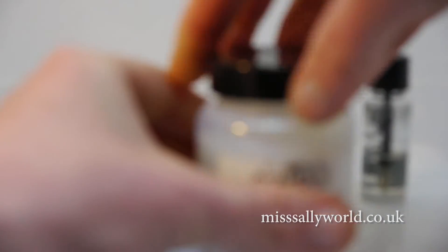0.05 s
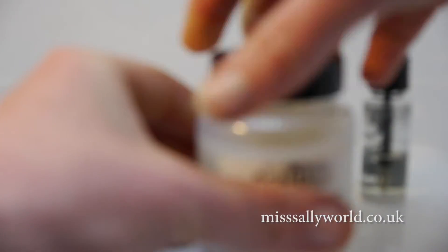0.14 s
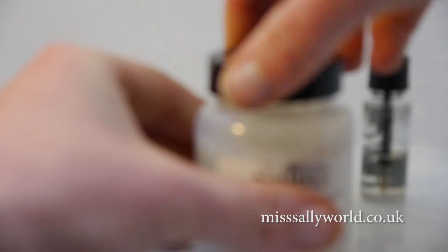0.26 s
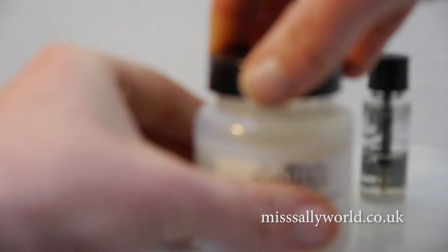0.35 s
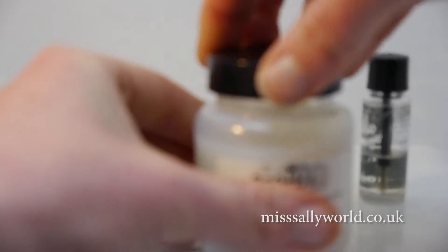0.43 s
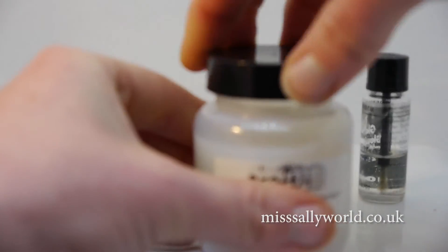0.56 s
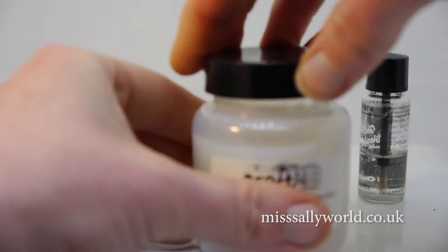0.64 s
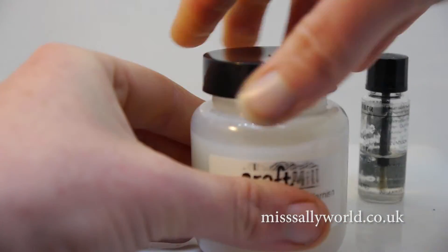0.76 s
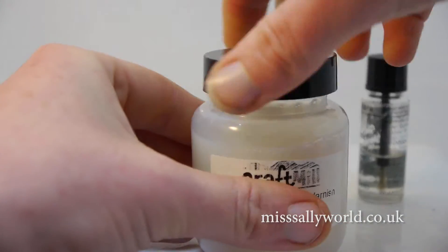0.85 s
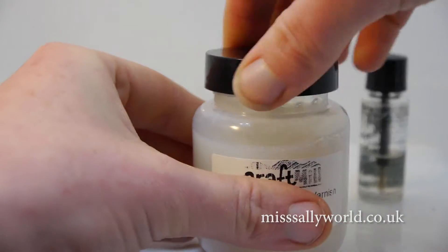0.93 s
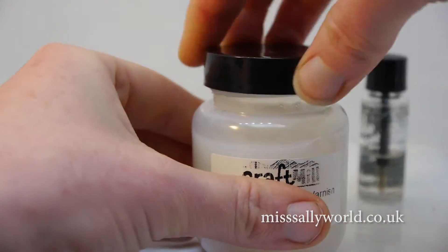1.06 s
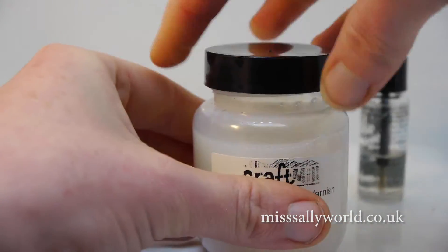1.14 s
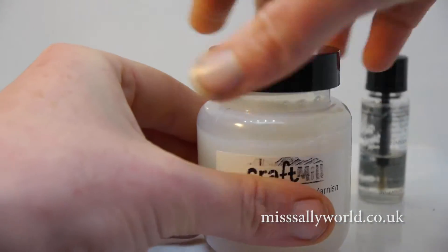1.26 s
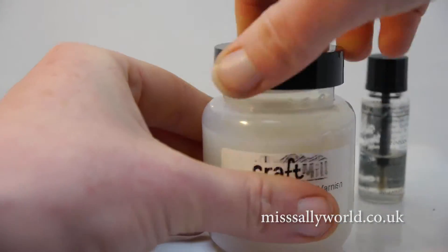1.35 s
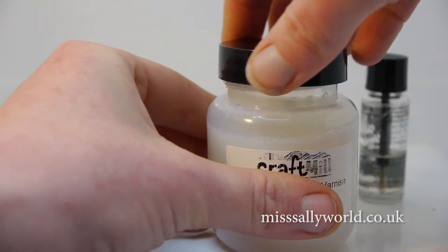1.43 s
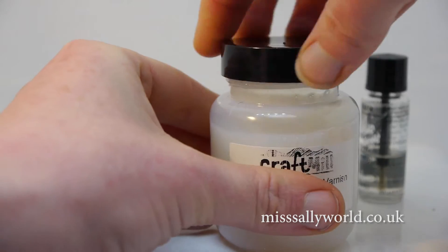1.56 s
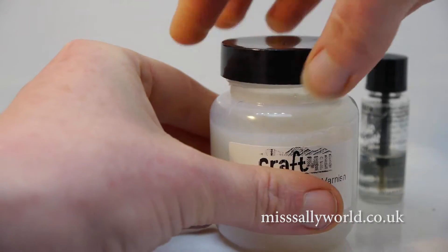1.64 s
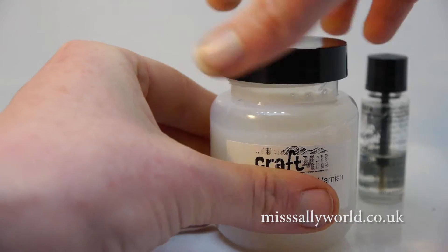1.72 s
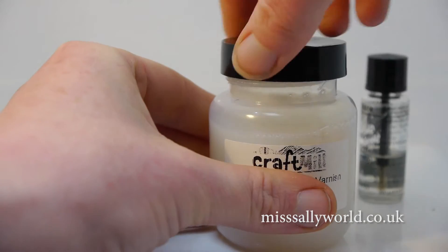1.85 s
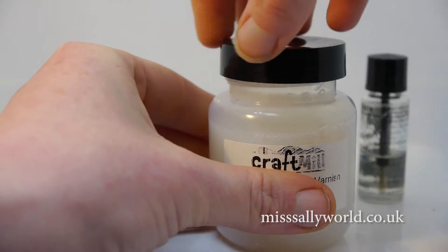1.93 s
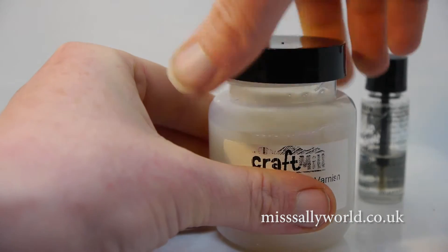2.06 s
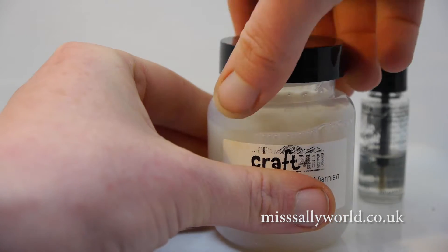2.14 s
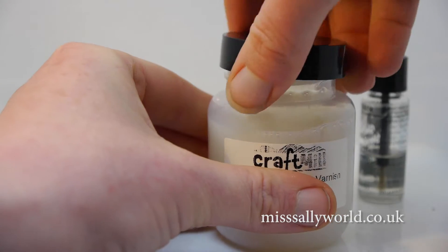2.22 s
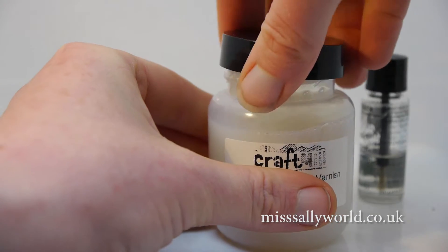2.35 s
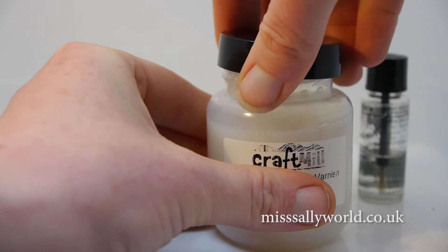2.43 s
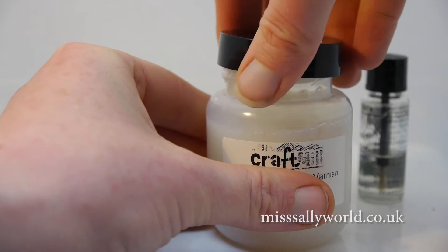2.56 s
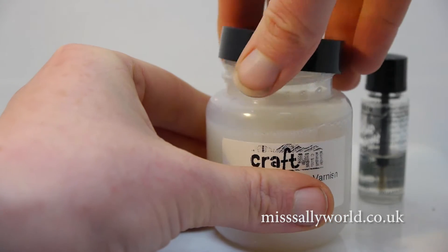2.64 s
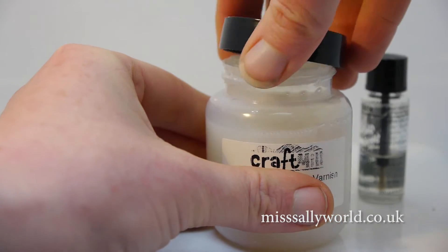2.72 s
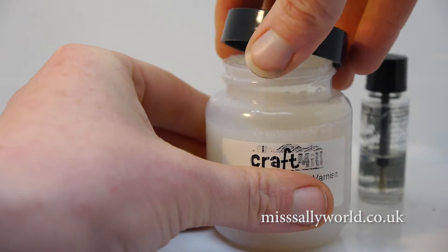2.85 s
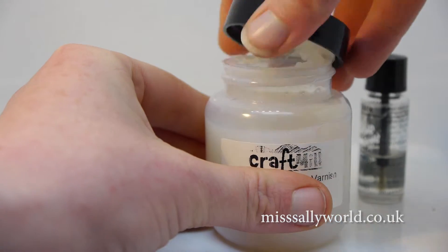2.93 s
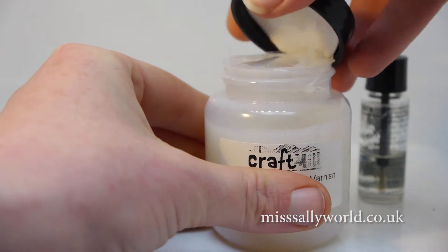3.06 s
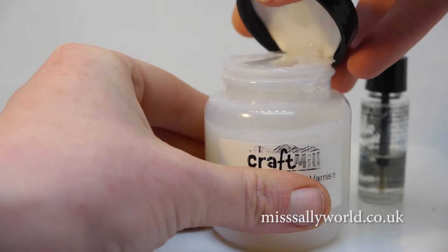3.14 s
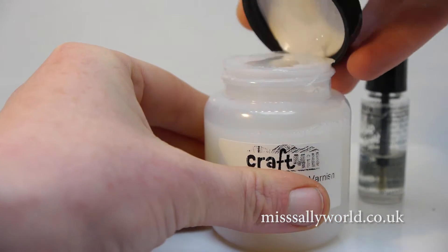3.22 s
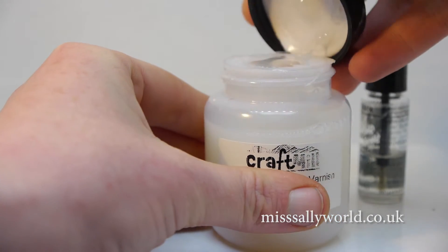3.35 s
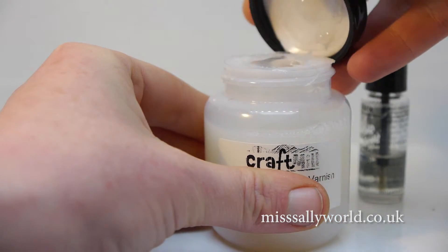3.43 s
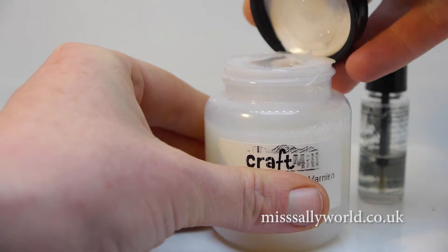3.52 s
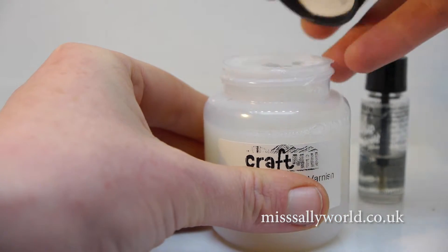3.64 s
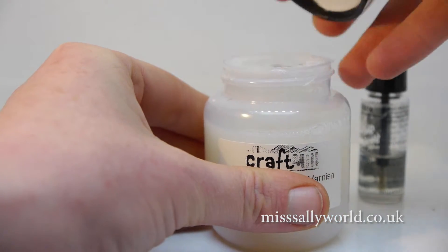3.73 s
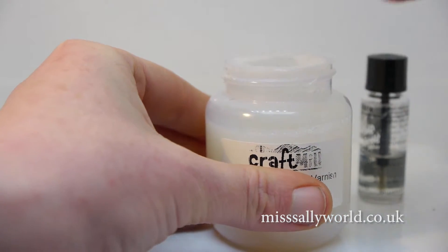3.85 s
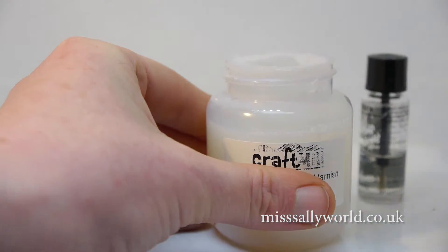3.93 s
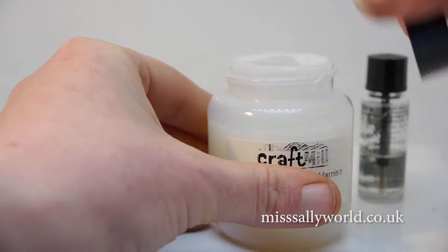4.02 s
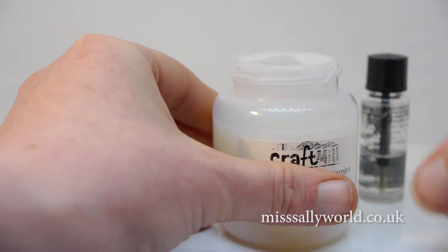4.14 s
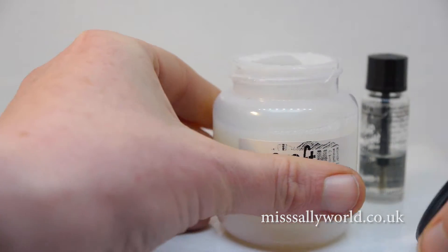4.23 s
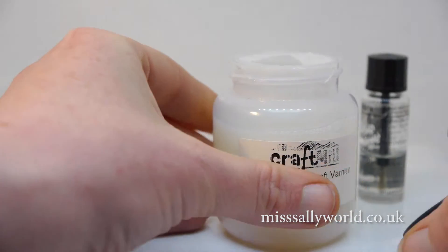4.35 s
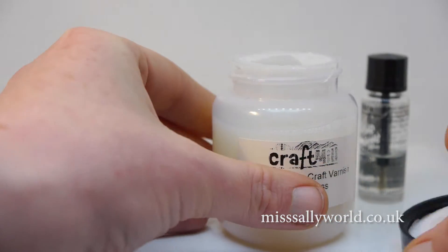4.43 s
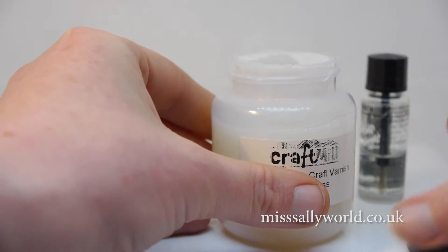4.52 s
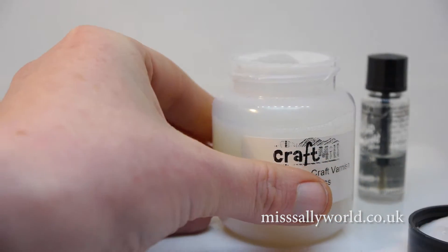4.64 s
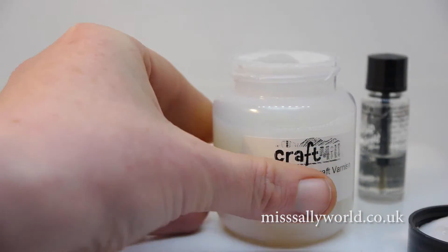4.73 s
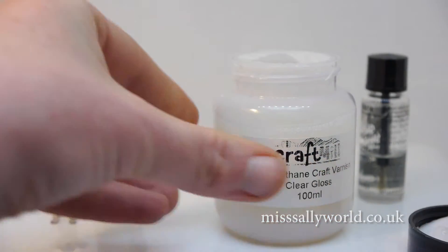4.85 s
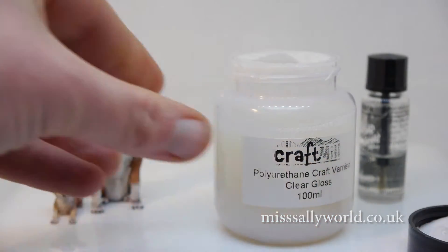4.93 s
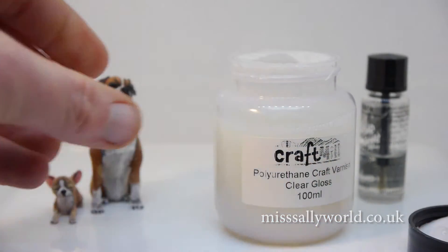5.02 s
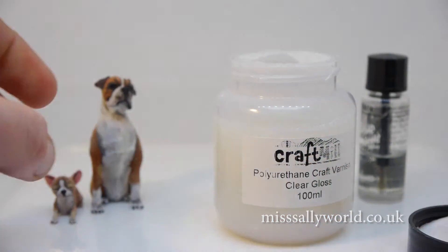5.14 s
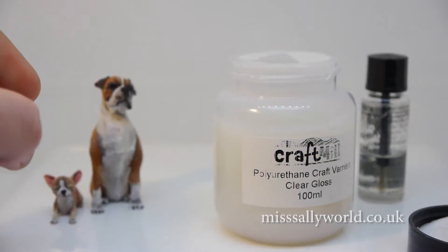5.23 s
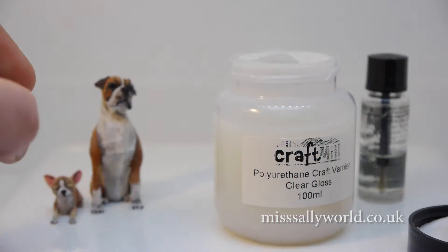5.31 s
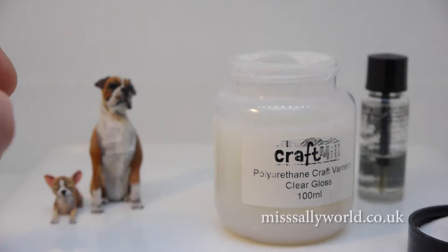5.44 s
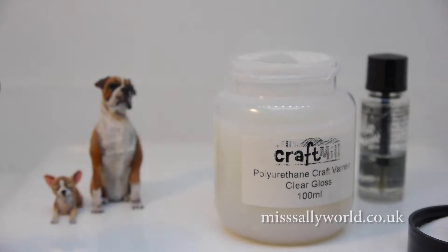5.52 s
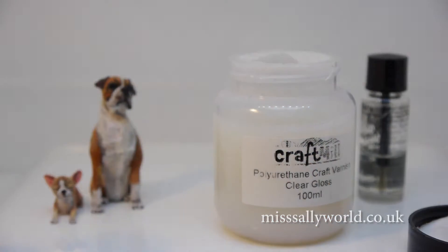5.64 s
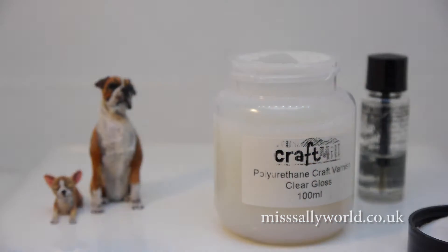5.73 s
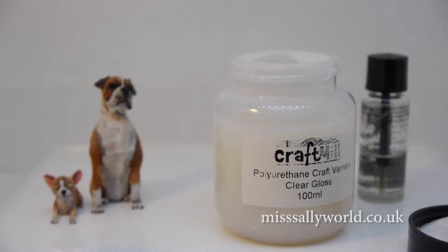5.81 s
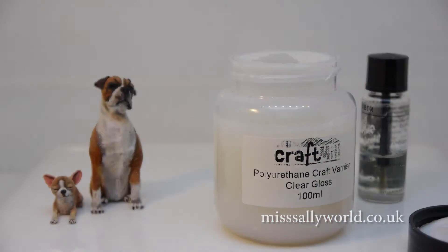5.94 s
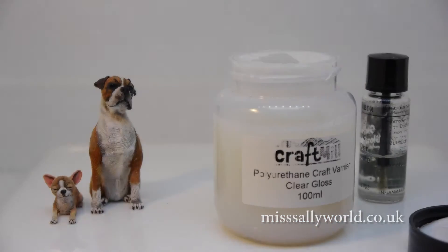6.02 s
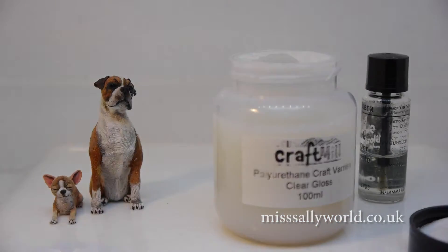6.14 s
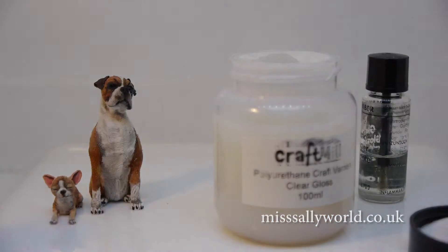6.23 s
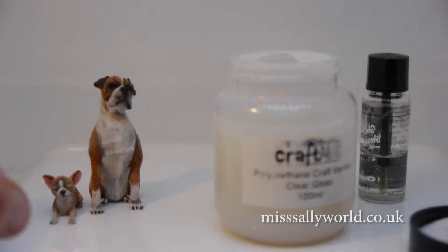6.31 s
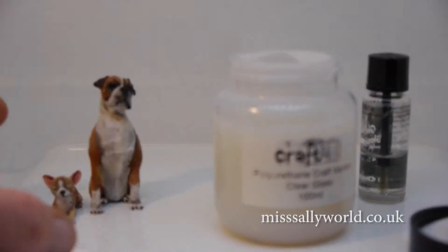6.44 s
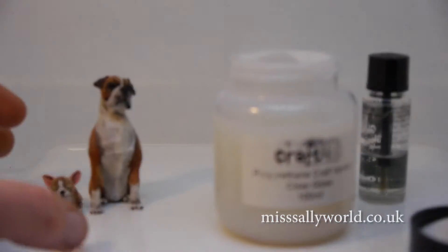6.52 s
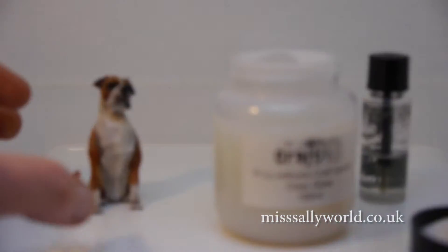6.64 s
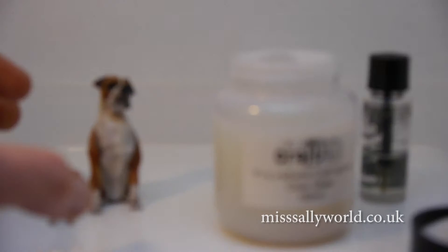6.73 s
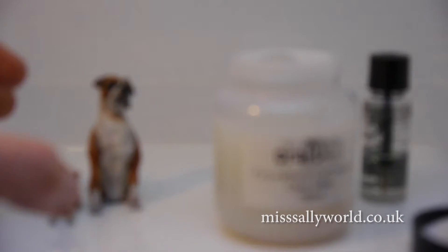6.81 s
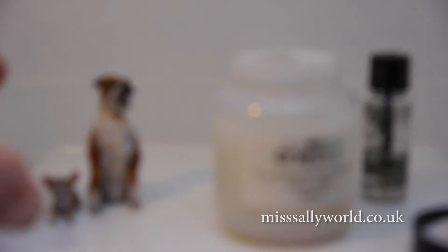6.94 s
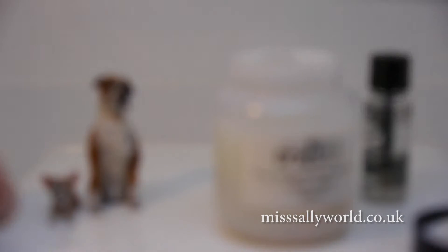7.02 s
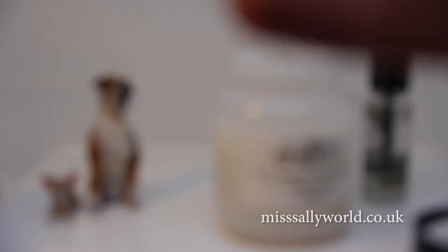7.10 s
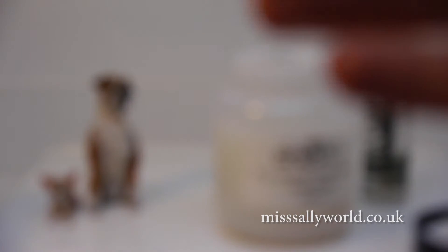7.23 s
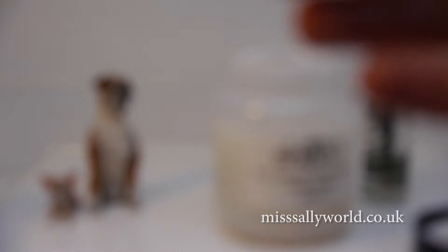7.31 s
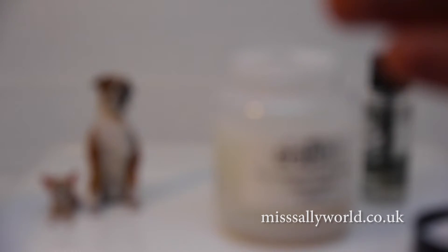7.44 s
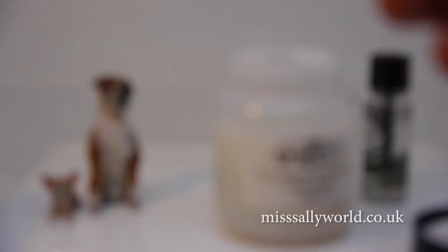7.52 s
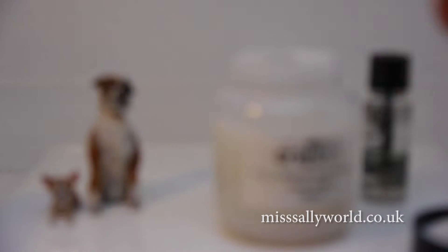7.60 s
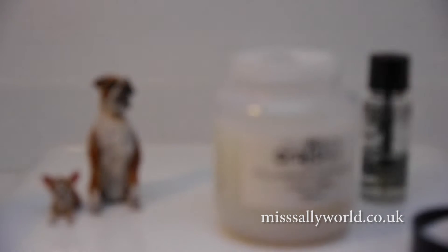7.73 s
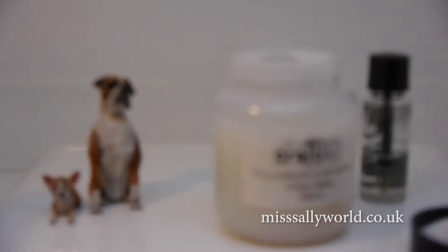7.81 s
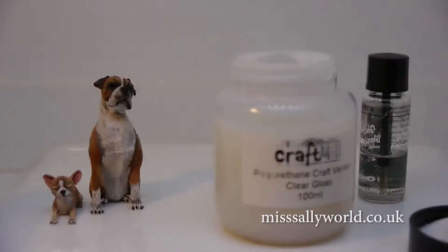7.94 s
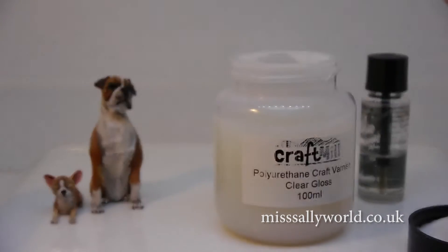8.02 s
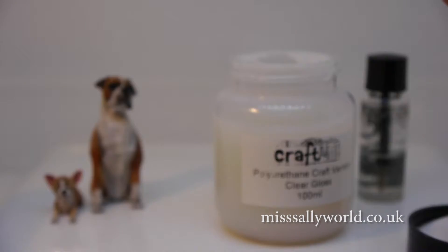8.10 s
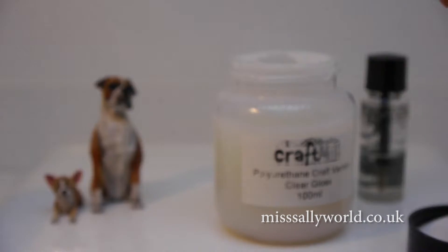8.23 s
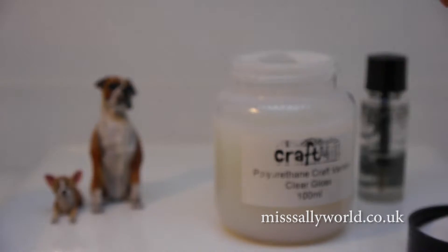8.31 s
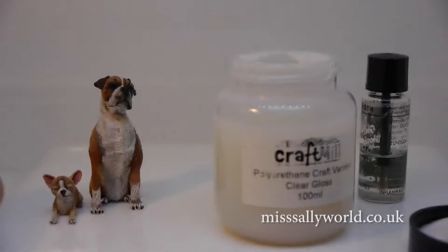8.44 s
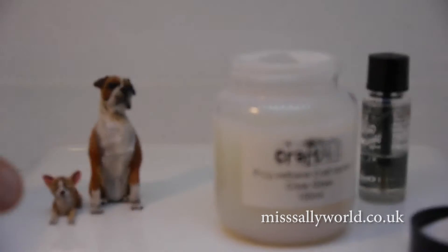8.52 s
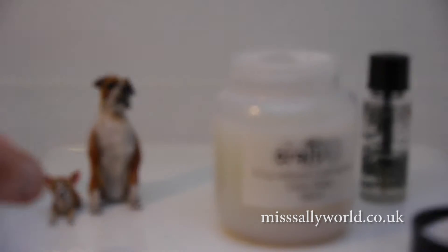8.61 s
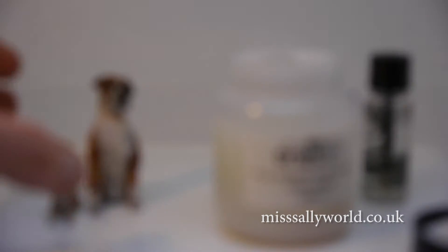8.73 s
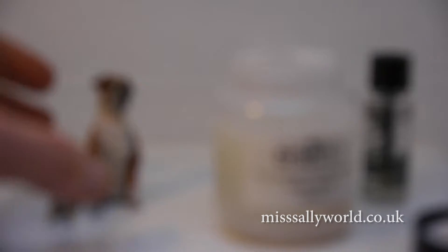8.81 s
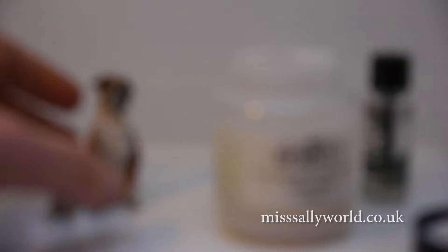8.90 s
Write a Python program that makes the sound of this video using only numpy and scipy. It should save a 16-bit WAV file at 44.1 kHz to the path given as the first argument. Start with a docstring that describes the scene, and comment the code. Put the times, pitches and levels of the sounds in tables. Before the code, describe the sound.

From the start, a plastic lid is twisted off a small jar, close up in a quiet room. The thread sticks and slips in short, thin rasps, crackles and ticks, while the jar rocks on the table with dull, hollow bumps, strongest near 1.7 and 2.7 seconds. A sharp tick comes at 3 seconds, then the lid scrapes round the rim and clicks free at about 3.6. At 4.3 seconds it knocks onto the table and settles with a quick chatter around 4.5, the loudest moment. Between 5.1 and 5.5 seconds a small figurine is set down with several light clacks. A hand slides softly over the tabletop, with a small tap at 6.2, a couple of ticks and two faint sleeve swishes before 7 seconds. After that only a few tiny ticks and a very faint whirr remain over low room hum, until about 9 seconds.

```python
"""A plastic lid is unscrewed from a small jar on a table, close up in a quiet room.
The thread sticks and slips, rasping and crackling, while the jar bumps the tabletop and makes it boom.
The lid wipes round the rim, clicks free and lands with a chatter; then a small figurine clacks down.
A hand hisses over the table and nudges it, a sleeve swishes, and a faint whirr rises over the room tone."""
import sys
import numpy as np
from scipy import signal
from scipy.fft import rfft, irfft, next_fast_len
from scipy.io import wavfile

SR = 44100
rng = np.random.default_rng(int(sys.argv[2]) if len(sys.argv) > 2 else 0)


def wrap_up_sound(samples):
    """Save the sound to the file named by the first command line argument, as 16-bit audio."""
    columns = np.atleast_2d(samples).T
    # keep every value between -1 and 1, then stretch to whole-number steps
    tamed = np.clip(columns, -1, 1)
    steps = np.round(tamed * 32767).astype(np.int16)
    wavfile.write(sys.argv[1], SR, steps)


N = 395430
TIME = np.arange(N) / SR
BLOW_TIME = np.arange(SR // 4) / SR   # seconds within one blow

# pushes of the lid along the thread, round the rim and off it: start_s, length_s, level_db
LID_TURNS = [(0, 0.11, -50), (.31, 0.67, -55), (.83, 1.0, -45), (.98, 0.24, -50.5), (1.28, 0.18, -44),
             (1.365, 0.082, -40.5), (1.47, 0.18, -42.5), (1.7, 0.95, -50.5), (2.107, 0.086, -40.5),
             (2.28, 0.13, -39.5), (2.755, 0.12, -40.5), (2.73, 0.81, -45), (2.985, 0.25, -41.5),
             (3.3, 0.12, -38), (3.36, 0.23, -42), (3.5, 0.6, -55)]
# skids and ticks of plastic and fingertips: start_s, level_db, t60_s, brightness_hz
SKIDS = [(0.345, -40.5, 0.17, 15600), (0.452, -44, 0.042, 14000), (1.093, -45, 0.017, 16000),
         (1.31, -42, 0.029, 16000), (1.415, -36, 0.051, 7240), (1.724, -41.5, 0.018, 12000),
         (1.894, -42.5, 0.024, 8750), (2.131, -47, .04, 12000), (2.17, -54, 0.024, 10000),
         (2.464, -44.5, .043, 7100), (2.645, -48, 0.078, 5630), (2.961, -31.5, 0.04, 12000),
         (3.249, -40, 0.055, 5500), (3.505, -35, 0.037, 11000), (3.942, -39, 0.031, 12000),
         (4.057, -40, 0.061, 12100), (4.205, -45, 0.029, 4000), (4.791, -46, 0.031, 10700),
         (5.374, -42, 0.095, 16300), (5.495, -44.5, 0.051, 14000), (6.496, -42, 0.026, 12000),
         (6.643, -35.5, 0.047, 10500), (7.551, -54.5, 0.074, 13000), (7.902, -51, .06, 13200),
         (8.17, -60.5, .06, 8000)]
# knocks: start_s, level_db, hardness (0 padded push, 1 bare edge)
JAR_BUMPS = [(0.066, -25, 0), (0.088, -25, 0.27), (0.212, -36.5, 0.26), (0.291, -29, 0.28),
             (0.546, -36.5, 0.78), (0.736, -36.5, 0.61), (0.898, -25, 0.43), (1.143, -25, 0.46),
             (1.391, -28, 0.38), (1.649, -29.5, 0), (1.6935, -23, 0.54), (1.819, -31, 0.43),
             (1.861, -32.5, 0.39), (2.143, -26.5, 0.18), (2.284, -40, 0.82), (2.367, -29.5, 0.22),
             (2.684, -22.5, 0.56), (2.997, -32.5, 0.4), (3.612, -33, 0.57), (3.964, -34, 0.4)]   # jar rocking on the table
LID_HITS = [(3.0335, -39.5, 0.8), (3.5722, -34.5, 0.9), (3.5925, -29, 0.97), (4.3113, -13.5, 0.62),
            (4.3162, -20, 0.6), (4.5037, -14, 0.83), (4.519, -19.5, 0.56), (4.5584, -19, 0.84),
            (4.574, -19.5, 0.51), (4.5895, -24, 0.67)]   # lid striking the rim, then the table
FIGURINE_HITS = [(5.107, -22, 0.21), (5.2079, -19, 0.78), (5.2425, -19.5, 0.7), (5.3335, -22.5, 0.47),
                 (5.337, -15.5, 0.29), (5.4205, -23, 0.46), (6.2, -36, 0.73)]   # figurine set down and nudged
# table swaying after the heaviest pushes: start_s, level_db
TABLE_THUDS = [(0.074, -30.5), (0.912, -33), (1.691, -26), (1.849, -31), (2.688, -33), (3.588, -30.5)]
# hand sweeping over the table: middle_s, length_s, level_db
HAND_STROKES = [(4.06, 0.7, -55.5), (4.298, 0.12, -51), (4.79, 1.12, -55.5), (5.9, 4.3, -62),
                (6.199, 0.12, -46), (6.547, 0.4, -52.5), (6.887, 0.37, -63)]
# dull fingertip rubs: start_s, length_s, level_db, pitch_hz
FINGER_RUBS = [(6.285, 0.092, -54.5, 1480), (7.71, 0.12, -55, 840)]
# swells: start_s, length_s, level_db
LID_CHATTER = [(4.488, 0.028, -28.5), (4.505, 0.092, -40.5), (4.556, 0.075, -41.5)]   # rim settling on the table
SLEEVE_SWISHES = [(6.38, 0.16, -50.5), (6.75, 0.19, -50.5)]   # arm moving
WHIRRS = [(7.15, 0.68, -64), (7.8, 1.2, -73.5)]   # faint, narrow whirr
# resonances that give each source its tone: pitch_hz, width_hz, gain_db
THREAD_MODES = [(1200, 1330, -7), (2024, 205, 1.5), (2540, 1340, -8), (4200, 800, -0.5), (5090, 1190, -1),
                (6580, 2100, -0.5), (8330, 3100, -2), (11000, 1760, -2), (13720, 2200, -7.5)]
LID_MODES = [(2150, 370, -2), (2420, 150, 2.5), (2650, 100, 5.5), (3030, 190, 0.5), (3800, 620, -5.5),
             (4450, 130, 1.5), (4780, 610, -4.5), (7760, 590, -9), (9000, 870, -8.5), (11200, 2000, -11.5),
             (14200, 1800, -15.5)]
TABLE_MODES = [(169.2, 57, -2), (282.7, 20, 11), (352.4, 22, 8), (520.3, 40.6, 8.5), (691, 100, -0.5),
               (929, 150, 0), (1220, 79, -0.5), (1402, 190, -2), (1780, 130, -5.5)]
FIGURINE_MODES = [(1106, 45, 3), (1276, 54, 3.5), (1454, 94, 2), (2030, 230, -5.5), (3120, 460, -2),
                  (3970, 690, -2.5), (5130, 280, -1), (5750, 440, -5), (8360, 730, -8), (11000, 660, -7.5),
                  (13700, 2500, -13.5)]
SLEEVE_MODES = [(1830, 360, 2), (2340, 360, 4), (3040, 1700, -2)]
WHIRR_MODES = [(1940, 73, 0), (2700, 77, -6), (3430, 57, -7), (4600, 140, -8)]
# noise colours of sliding skin and room air: frequency_hz, density_db
SKIN_SPECTRUM = [(700, 2.5), (1100, -2), (2500, -3.5), (5000, -6), (7000, -9), (11000, -11), (16000, -19.5)]
AIR_SPECTRUM = [(20, -40.5), (45, -5.5), (68, -23.5), (95, 1.5), (120, -7.5), (145, -7.5), (270, -6),
                (390, -17.5), (540, -15.5), (1100, -22), (1450, -22.5), (2100, -29), (4700, -30.5),
                (7000, -35.5), (11000, -38.5), (16000, -41.5)]
# electrical hum and whine: pitch_hz, level_db
HUM_TONES = [(116, -56.5), (7574, -80)]
# how alike left and right are: frequency_hz, correlation (0-1)
STEREO_LIKENESS = [(30, 1), (400, 0.99), (2500, 0.71), (4000, 0.38), (8000, 0.22), (16000, 0.14)]

RING_GLIDE_S, RING_GLIDE_HZ, RING_WIDTH_HZ = (0.5, 0.85), (4605, 5133), 200   # rises as the lid loosens
HELD_UNTIL_S, LET_GO_S, RESTING_DB = 4.6, 0.24, -53   # the hands rub faintly until they let go
RUMBLE_DB, RUMBLE_AT_RASP_DB, RUMBLE_FOLLOWS = -41.5, -36.5, 0.72   # rumble takes part of the rasp's swing
DULL_HZ, BRIGHT_AT_DB, BRIGHT_FOLLOWS = 5500, -42.5, 0.24   # a rasp below BRIGHT_AT_DB loses treble
SOFT_HZ, HARD_HZ = 153, 6100   # contact cut-off at hardness 0 and 1
WALL_ECHO_S, WALL_ECHO_DB = 0.0051, -12   # wall just behind the jar
NEARBY_T60_S, NEARBY_DB = .045, -11
ROOM_T60_S, ROOM_DB, ROOM_CUT_HZ = .42, -24, 1500


def unscrewing(rasp_db, ring_db, crackle_db, touch_db):
    """The thread sticks and slips in thin, ringing plastic; a harder turn is louder and brighter."""
    rasp = np.hypot(swells(LID_TURNS), from_db(touch_db))
    slips = friction(per_s=12000, size_db=2.4) * from_db(1.7 * drift(per_s=110))
    slips = rms_one(slips + from_db(crackle_db) * crackles(per_s=150, size_db=4, pitches=12))
    ring_hz = np.interp(TIME, RING_GLIDE_S, RING_GLIDE_HZ)
    ring = low_pass(slips, RING_WIDTH_HZ / 2, order=1) * np.cos(2 * np.pi * np.cumsum(ring_hz) / SR)
    shell = rms_one(rms_one(resonate(slips, THREAD_MODES)) + from_db(ring_db) * rms_one(ring))
    dull = low_pass(shell, DULL_HZ, order=1)
    treble = np.minimum(rasp / from_db(BRIGHT_AT_DB), 1) ** BRIGHT_FOLLOWS
    plastic = from_db(rasp_db) * rasp * (dull + treble * (shell - dull))
    held = np.clip(1 - (TIME - HELD_UNTIL_S) / LET_GO_S, 0, 1)
    return held * (plastic + grip_rumble(rasp, grip_db=2.0, jar_cut_hz=950))


def crackles(per_s, size_db, pitches, width_hz=350):
    """Sticky patches snap one by one, each a sharp tick with a brief, high ring."""
    ticks = from_db(size_db * np.minimum(rng.exponential(1, N), 3)) * (rng.random(N) < per_s / SR)
    pitch_index = rng.integers(0, pitches, N)
    rings = sum(resonate(ticks * (pitch_index == k), [(hz, width_hz, 0)])
                for k, hz in enumerate(np.geomspace(3000, 14000, pitches)))
    return rms_one(rms_one(rings) / 2 + rms_one(ticks))


def grip_rumble(rasp, grip_db, jar_cut_hz):
    """The jar and the gripping hand carry the thread's friction down into the table."""
    effort = np.hypot(rasp, from_db(RESTING_DB)) / from_db(RUMBLE_AT_RASP_DB)
    drag = friction(per_s=1500, size_db=2.5) * from_db(2 * drift(per_s=40))
    table = rms_one(low_pass(resonate(low_cut(drag, 385), TABLE_MODES), jar_cut_hz, order=1))
    grip = rms_one(low_pass(resonate(drag, [(114, 26, -1.1), (393, 47, -1.2)]), 528))
    return from_db(RUMBLE_DB) * effort ** RUMBLE_FOLLOWS * (table + from_db(grip_db) * grip)


def skids(gain_db, rise_share):
    """A caught edge lets go in a short burst; the shortest are sharp ticks."""
    out = np.zeros((2, N))
    for start_s, db, t60_s, bright_hz in SKIDS:
        burst = resonate(scatter(t60_s, rise_share * t60_s), THREAD_MODES)
        burst = low_pass(low_cut(burst, bright_hz / 3), bright_hz)
        add(out, start_s, from_db(db + gain_db) * unit_blow(burst))
    return out


def knocks(hits, modes, rise_at_1khz_s, crack_t60_s, tail_t60_s, low_cut_hz,
           main_mode_db, rough_db, snap_db, soft_clack_db, hard_clack_db):
    """Each blow booms in the tabletop and clacks in the object; a soft one is duller and slower."""
    out = np.zeros((2, N))
    click = unit_blow(1. * (BLOW_TIME == 0))
    # the table's main mode is strongest for a blow near its middle
    table = [(hz, width, db + main_mode_db * (k == 1)) for k, (hz, width, db) in enumerate(TABLE_MODES)]
    for start_s, db, hardness in hits:
        contact_hz = SOFT_HZ * (HARD_HZ / SOFT_HZ) ** hardness
        clack_db = soft_clack_db + (hard_clack_db - soft_clack_db) * hardness
        rise_s = rise_at_1khz_s * 1000 / contact_hz
        push = low_pass(click + from_db(rough_db) * scatter(.045, rise_s), contact_hz)
        push = high_pass(push, low_cut_hz)   # a light object cannot drive the lowest modes
        boom = unit_blow(resonate(push, table))
        rattle = from_db(snap_db) * click + scatter(crack_t60_s, rise_s) + scatter(tail_t60_s, rise_s) / 2
        rattle = low_pass(low_pass(rattle, 5 * contact_hz, order=1), 20 * contact_hz)
        clack = pan(unit_blow(resonate(rattle, modes)), right_db=0.95)
        add(out, start_s, from_db(db) * (boom + from_db(clack_db) * clack))
    return out


def table_thuds(pitch_hz, width_hz, t60_s):
    """A heavy push makes the whole table sway: a slow, deep thud."""
    out, sway = np.zeros((2, N)), [(pitch_hz, width_hz, 0)]
    for start_s, db in TABLE_THUDS:
        push = scatter(t60_s, rise_s=t60_s / 10)
        add(out, start_s, from_db(db) * unit_blow(resonate(resonate(push, sway), sway)))
    return out


def lid_chatter(plastic_db, table_db):
    """Quick, tiny touches of the rim keep the lid and the tabletop ringing between the blows."""
    touches = friction(per_s=1500, size_db=2.5)
    plastic = from_db(plastic_db) * rms_one(resonate(low_pass(touches, 8400, order=1), LID_MODES))
    table = from_db(table_db) * rms_one(resonate(low_cut(touches, 664), TABLE_MODES))
    return swells(LID_CHATTER, shape=0.6) * (plastic + table)


def hand_slides(gain_db):
    """Skin on the tabletop gives a soft, grainy hiss that swells and fades with each sweep."""
    speed = sum(from_db(db) * np.cos(np.pi * np.clip((TIME - middle_s) / length_s, -.5, .5)) ** 2
                for middle_s, length_s, db in HAND_STROKES)
    hiss = rms_one(stereo_noise(N, SKIN_SPECTRUM)) * from_db(1.2 * drift(per_s=80))
    return from_db(gain_db) * speed * hiss


def sleeve_swishes():
    """Fine cloth friction swells with each move of the arm."""
    return swells(SLEEVE_SWISHES, shape=0.56) * rms_one(resonate(stereo_noise(N), SLEEVE_MODES))


def finger_rubs(width_share):
    """A fingertip rubs softly: one dull band of noise for each stroke."""
    noise = stereo_noise(N)
    return sum(swells([stroke]) * rms_one(resonate(noise, [(hz, width_share * hz, 0)]))
               for *stroke, hz in FINGER_RUBS)


def whirr():
    """A faint whirr: noise in a few narrow bands, swelling and fading."""
    return swells(WHIRRS) * rms_one(resonate(stereo_noise(N), WHIRR_MODES))


def room_tone(air_db):
    """Steady room rumble from slightly left, with a faint hum and a thin electrical whine."""
    air = delay_right(rms_one(stereo_noise(N, AIR_SPECTRUM)), samples=4)
    hum = sum(from_db(db) * np.sqrt(2) * np.sin(2 * np.pi * hz * TIME) for hz, db in HUM_TONES)
    return from_db(air_db) * pan(air, right_db=-0.28) + hum


def room(x):
    """Direct sound, near reflections that colour the treble, then a weak, dull tail from the walls."""
    t = TIME[:SR]
    near = from_db(NEARBY_DB) * rms_one(stereo_noise(SR) * from_db(-60 * t / NEARBY_T60_S)) / np.sqrt(SR)
    near[:, round(WALL_ECHO_S * SR)] += from_db(WALL_ECHO_DB)
    near = high_pass(near, 900)   # small surfaces return no bass
    tail = low_pass(stereo_noise(SR), ROOM_CUT_HZ, order=1) * from_db(-60 * t / ROOM_T60_S)
    tail = from_db(ROOM_DB) * rms_one(tail) / np.sqrt(SR)
    return x + signal.fftconvolve(x, near + tail, axes=1)[:, :N]


def friction(per_s, size_db):
    """Stick-slip: tiny releases at random moments, a few much larger than the rest."""
    sizes = from_db(size_db * np.minimum(rng.exponential(1, N), 4))
    releases = rng.standard_normal((2, N)) * sizes * (rng.random(N) < per_s / SR)
    return rms_one(spread(releases))


def scatter(t60_s, rise_s):
    """A burst of tiny contacts that builds up and dies away."""
    envelope = (1 - np.exp(-BLOW_TIME / rise_s)) * from_db(-60 * BLOW_TIME / t60_s)
    return unit_blow(stereo_noise(len(BLOW_TIME)) * envelope)


def swells(rows, shape=0.5):
    """Each row swells and fades as a power of a half sine; overlaps add in energy."""
    energy = np.zeros((1, N))
    for start_s, length_s, db in rows:
        arch = np.abs(np.sin(np.linspace(0, np.pi, round(length_s * SR))))
        add(energy, start_s, from_db(2 * db) * arch[None] ** (2 * shape))
    return np.sqrt(energy[0])


def drift(per_s):
    """A random wander of rms 1."""
    return rms_one(np.interp(TIME * per_s, np.arange(SR // 10), rng.standard_normal(SR // 10)))


def resonate(x, modes):
    """Parallel resonances with alternating signs."""
    out = 0
    for k, (hz, width_hz, db) in enumerate(modes):
        radius = np.exp(-np.pi * width_hz / SR)
        poles = [1, -2 * radius * np.cos(2 * np.pi * hz / SR), radius ** 2]
        gain = (-1) ** k * from_db(db) * (1 - radius ** 2) / 2
        out = out + gain * signal.lfilter([1, 0, -1], poles, x + 1e-18)
    return out


def stereo_noise(samples, spectrum=None):
    """Wide noise, white unless given a spectrum."""
    return spread(rng.standard_normal((2, samples)), spectrum)


def spread(pair, spectrum=None):
    """Two unrelated signals become left and right, alike in the bass and apart in the treble."""
    size = next_fast_len(pair.shape[-1])
    hz = np.arange(size // 2 + 1) * SR / size
    mid, side = rfft(pair, size) * (from_db(at_hz(spectrum, hz)) if spectrum else 1)
    alike = np.clip(at_hz(STEREO_LIKENESS, hz), 0, 1)
    left_right = np.sqrt(1 + alike) * mid + np.sqrt(1 - alike) * side * [[1], [-1]]
    return irfft(left_right, size)[:, :pair.shape[-1]]


def pan(x, right_db):
    """Tilt the level toward the right."""
    return x * from_db([[-right_db], [right_db]])


def delay_right(x, samples):
    """The right side hears it slightly later."""
    return np.array([x[0], np.roll(x[1], samples)])


def low_pass(x, hz, order=2):
    """Roll off the treble."""
    return signal.sosfilt(signal.butter(order, min(hz, .45 * SR), fs=SR, output="sos"), x)


def high_pass(x, hz):
    """Roll off the bass, 12 dB an octave."""
    return signal.sosfilt(signal.butter(2, hz, "high", fs=SR, output="sos"), x)


def low_cut(x, hz):
    """Thin the bass gently, 6 dB an octave."""
    return x - low_pass(x, hz, order=1)


def at_hz(points, hz):
    """Read a curve on a log-frequency axis."""
    point_hz, value = np.transpose(points)
    return np.interp(np.log(hz + 1), np.log(point_hz), value)


def from_db(db):
    """Decibels to gain."""
    return 10 ** (np.asarray(db) / 20)


def rms_one(x):
    """Scale to rms 1."""
    return x / np.sqrt(np.mean(x ** 2) + 1e-20)


def unit_blow(x):
    """Scale a blow to the energy of 10 ms at rms 1."""
    return rms_one(x) * np.sqrt(.01 * SR / x.shape[-1])


def add(out, start_s, sound):
    """Mix a sound in at its cue."""
    i = round(start_s * SR)
    out[:, i:i + sound.shape[-1]] += sound[:, :N - i]


def scene():
    """Jar, lid, figurine and hand in the room, over the whirr and the room tone."""
    jar = knocks(JAR_BUMPS, LID_MODES, rise_at_1khz_s=0.041, crack_t60_s=0.024, tail_t60_s=0.066,
                 low_cut_hz=111, main_mode_db=1.5, rough_db=-1, snap_db=-7.5,
                 soft_clack_db=-38, hard_clack_db=6)
    jar += table_thuds(pitch_hz=116, width_hz=110, t60_s=0.23)
    lid = knocks(LID_HITS, LID_MODES, rise_at_1khz_s=0.00045, crack_t60_s=0.015, tail_t60_s=0.1,
                 low_cut_hz=240, main_mode_db=-1.5, rough_db=5.5, snap_db=-12.5,
                 soft_clack_db=-36, hard_clack_db=11)
    lid += lid_chatter(plastic_db=4, table_db=7.5)
    figurine = knocks(FIGURINE_HITS, FIGURINE_MODES, rise_at_1khz_s=0.00082, crack_t60_s=0.03,
                      tail_t60_s=0.12, low_cut_hz=170, main_mode_db=6, rough_db=2, snap_db=-12,
                      soft_clack_db=-25, hard_clack_db=8.5)
    thread = unscrewing(rasp_db=1.5, ring_db=-11.5, crackle_db=-5.5, touch_db=-64.5)
    thread += skids(gain_db=1, rise_share=0.035)
    arm = hand_slides(gain_db=6) + sleeve_swishes() + finger_rubs(width_share=0.25)
    foreground = pan(thread, right_db=0.4) + jar + delay_right(lid + figurine + arm, samples=1)
    return whirr() + room(foreground) + room_tone(air_db=-48.5)


def record(dry):
    """Peaks clip at full scale and the top is cut steeply at 16 kHz."""
    return signal.sosfilt(signal.ellip(10, .1, 80, 16000, fs=SR, output="sos"), np.clip(dry, -1, 1))


dry = scene()
out = record(dry)
wrap_up_sound(out)
```